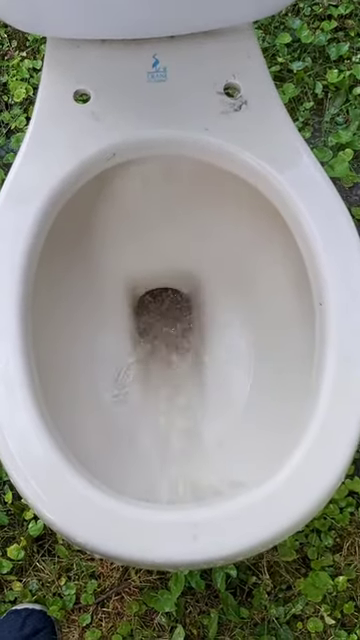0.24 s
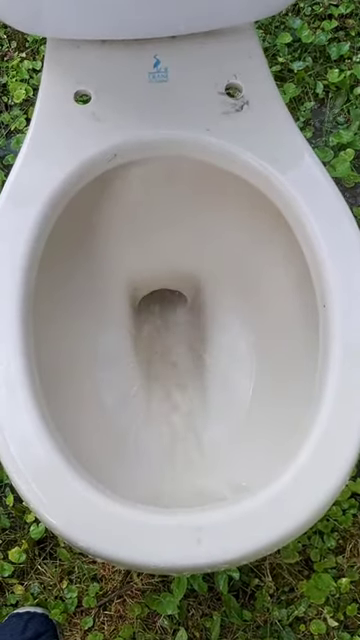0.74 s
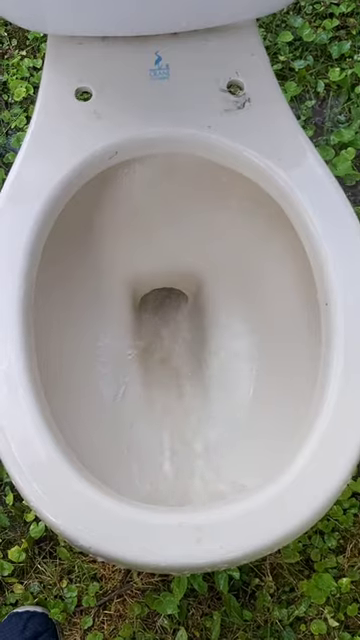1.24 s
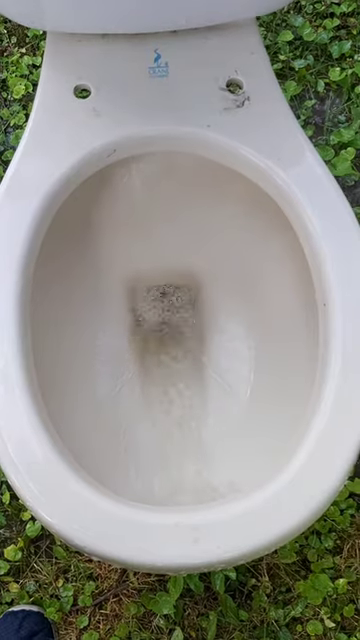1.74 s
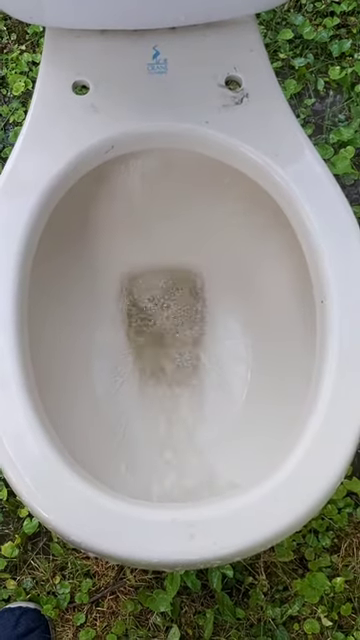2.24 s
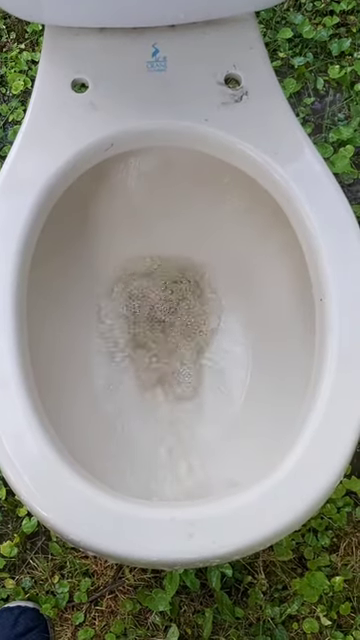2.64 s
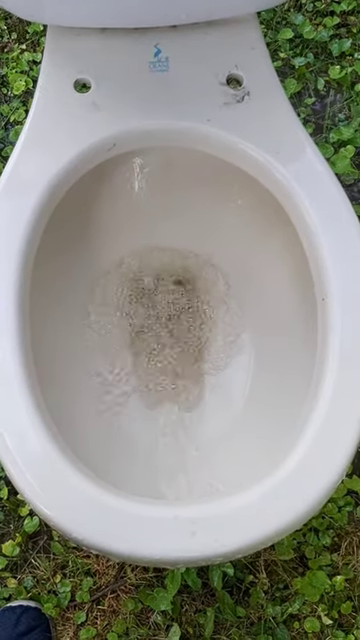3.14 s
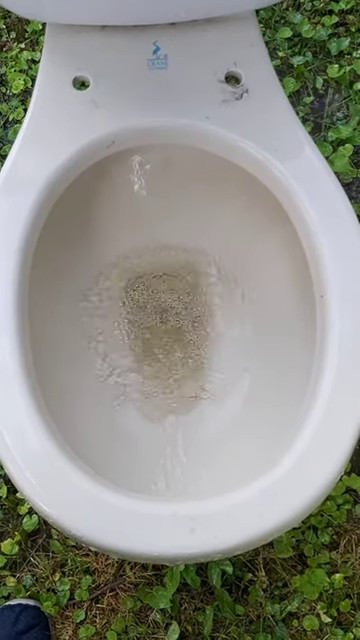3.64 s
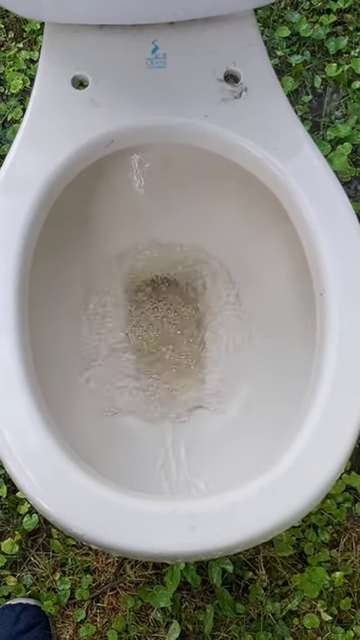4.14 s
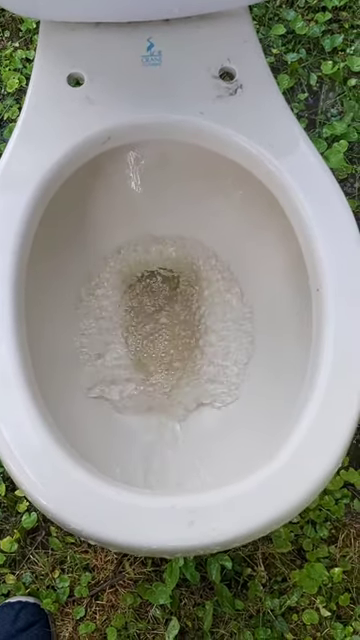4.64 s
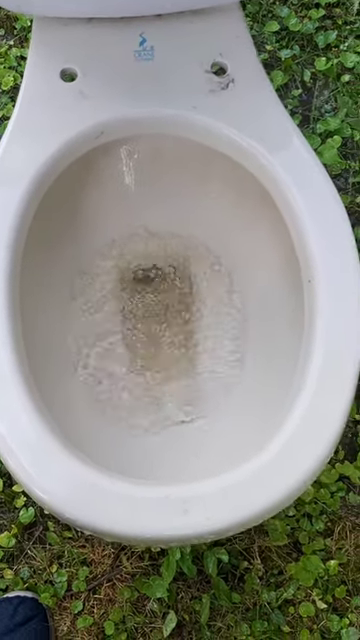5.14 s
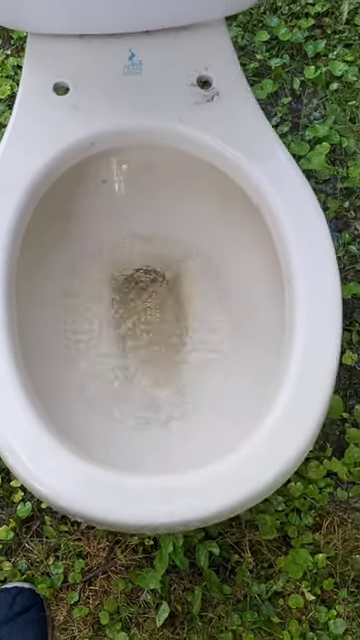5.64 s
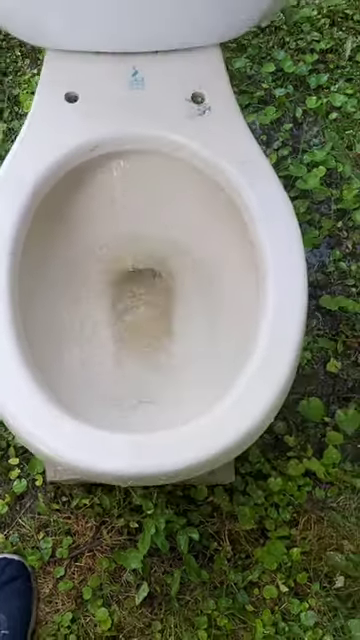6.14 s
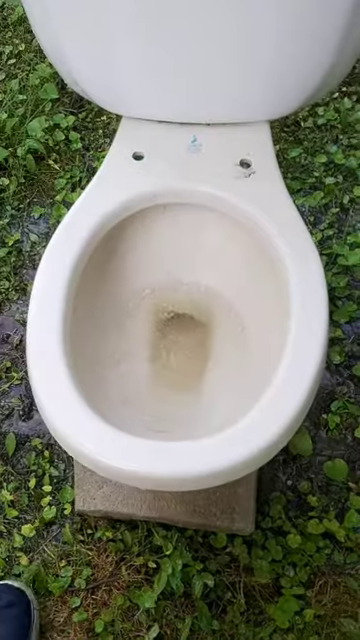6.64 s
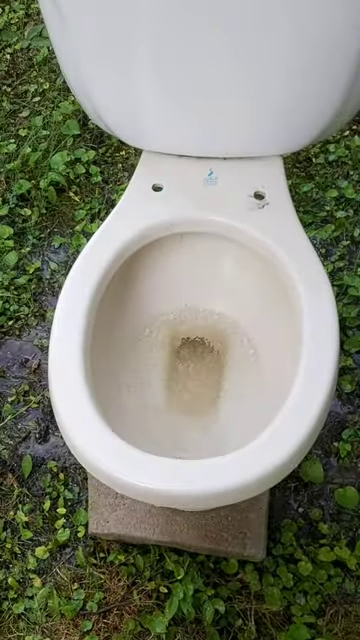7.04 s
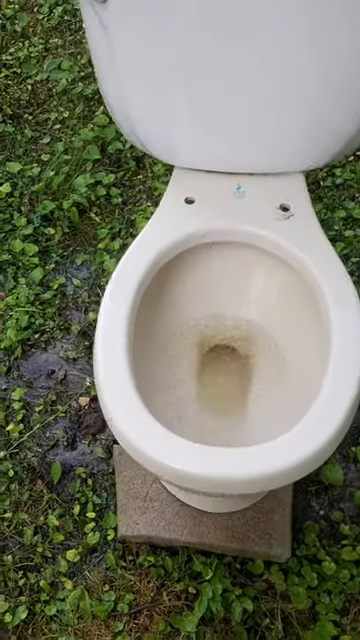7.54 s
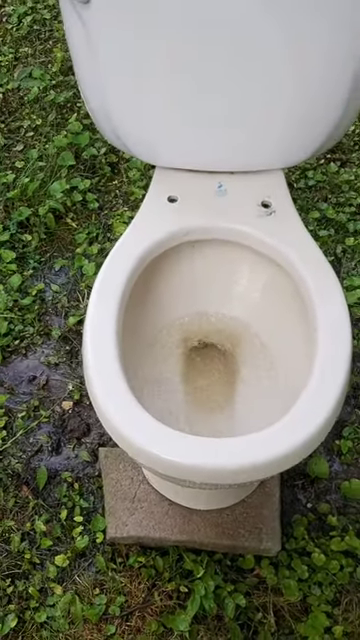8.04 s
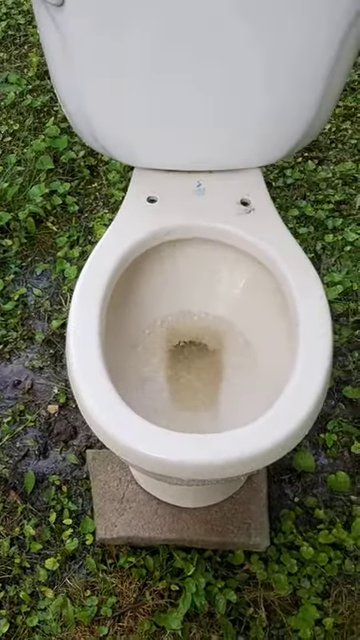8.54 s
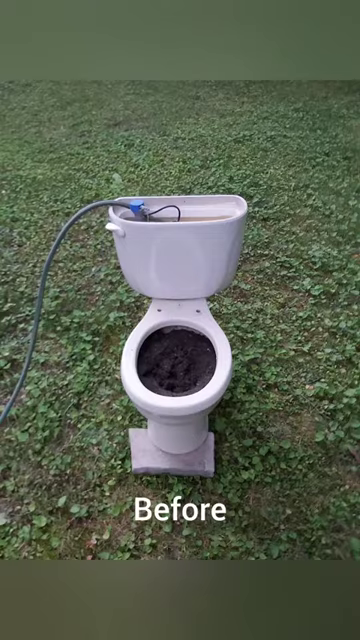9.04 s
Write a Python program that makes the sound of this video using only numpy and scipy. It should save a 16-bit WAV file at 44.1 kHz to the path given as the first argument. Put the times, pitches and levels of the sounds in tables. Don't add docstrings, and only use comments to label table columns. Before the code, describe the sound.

Close-up rush of water in a porcelain bowl outdoors, gurgling and crackling, fading to a sparse trickle and quiet drips before sudden silence.

```python
import sys
import numpy as np
from scipy import signal
from scipy.io import wavfile
from scipy.ndimage import uniform_filter1d

SR = 44100
rng = np.random.default_rng(int(sys.argv[2]) if len(sys.argv) > 2 else 0)


def boost(x):
    u = np.asarray(x, float) / 20
    return 10 ** u


def bounce(signal):
    frames = np.transpose(np.atleast_2d(signal))
    limited = np.clip(frames, -1, 1)
    pcm = np.round(limited * 32767).astype(np.int16)
    wavfile.write(sys.argv[1], SR, pcm)


N = 410123


def evened(x):
    return x / np.sqrt(np.mean(x ** 2) + 1e-20)


def read(points, hz):
    f, value = np.transpose(points)
    return np.interp(np.log(hz + 1), np.log(f + 1), value)


def curves(rows, t):
    s, *columns = np.transpose(rows)
    return [np.interp(t, s, c) for c in columns]


def resonate(x, hz, width):
    turn = np.exp(2j * np.pi * np.cumsum(hz * np.ones(len(x))) / SR)
    r = np.exp(-np.pi * width / SR)
    return 2 * (turn * signal.lfilter([1 - r], [1, -r], x / turn)).real


def rung(x, modes, lift_db):
    return sum(boost(db + lift_db) * signal.lfilter(*signal.iirpeak(hz, hz / width, SR), x)
               for hz, width, db in modes)


def lumps(seconds):
    width = max(int(seconds * SR), 1)
    return evened(uniform_filter1d(uniform_filter1d(rng.standard_normal(N), width), width))


def sides(x, pan_db):
    return np.array([x * boost(pan_db / 2), x * boost(-pan_db / 2)])


def paste(mix, s, pair):
    mix[:, round(s * SR):][:, :pair.shape[1]] += pair


# [start_s, splash_db]
FLOW = [(0.0, -27.5), (0.35, -31.5), (0.78, -28.5), (1.43, -31), (2.38, -32), (2.42, -34), (2.73, -35.5),
        (3.25, -39), (3.44, -38.5), (3.54, -40), (4.32, -46), (4.62, -41), (4.71, -37), (4.97, -43),
        (4.995, -49.5), (5.64, -51.5), (5.96, -56.5), (6.22, -59.5), (8.3, -60.5)]
# [start_s, spray_over_splash_db]
RIM_JETS = [(0.0, -1.5), (0.3, 5.5), (0.8, -2.5), (1.43, 3.5), (2.3, 1), (3.3, -0.5), (3.45, -5),
            (4.05, -4), (4.3, 0.5), (5.0, 0)]
# [start_s, left_right_db]
CAMERA_TURN = [(0.0, -0.5), (4.0, -1.5), (5.6, -2), (6.2, -7.5), (6.96, -9.5), (7.9, -5.5), (8.3, -6)]


def flow(t):
    splash_db = curves(FLOW, t)[0]
    return splash_db, splash_db + curves(RIM_JETS, t)[0], curves(CAMERA_TURN, t)[0]


# [freq_hz, density_db_per_hz]
RUSH_COLOUR = [(24, -47.5), (40, -39), (180, -24), (276, -14), (433, -9.5), (697, -6), (1630, 0),
               (2000, -6.5), (2210, -5), (6490, -4.5), (8340, -14), (11800, -6.5), (16000, -10.5)]
# [freq_hz, density_db_per_hz]
TRICKLE_COLOUR = [(24, -39), (40, -6), (109, -9), (194, -9.5), (305, -5), (615, -10.5), (831, -10.5),
                  (2050, -12), (3740, -24.5), (5720, -19.5), (16000, -39)]
# [freq_hz, correlation]
PORT_LIKENESS = [(60, .9), (300, .95), (700, .97), (1400, .88), (3000, .6), (7000, .35), (15000, .3)]
# [freq_hz, left_right_db]
PORT_TILT = [(60, 2.5), (150, -16), (380, -10.5), (950, 3), (2380, -12), (5980, -2), (15000, -8.5)]
# [start_s, lead_samples]
LEFT_LEAD = [(0, 2), (2.7, 2), (3.1, 16), (5.8, 16), (6.2, -2), (8.6, -1)]


def rush():
    frames, hz = N // 128 + 5, np.fft.rfftfreq(512, 1 / SR)
    frame_s = np.arange(frames) * 128 / SR
    water_s = frame_s - 256 / SR
    a, b, c, d, patches, wide = rng.standard_normal((frames, 257, 6)).T
    patches = evened(uniform_filter1d(uniform_filter1d(patches, 5, 0), 8, 1))
    wide = evened(uniform_filter1d(uniform_filter1d(wide, 90, 0), 4, 1))
    splash_db, spray_db, pan_db = flow(water_s)

    strong = np.clip((splash_db + 66.0) / 22, 0, 1)
    colour_db = strong * read(RUSH_COLOUR, hz)[:, None] + (1 - strong) * read(TRICKLE_COLOUR, hz)[:, None]
    power, high = boost(2 * colour_db), hz > 3500
    spray_share = np.clip((hz[:, None] - 3000) / 1200, 0, 1)
    colour_db += (1 - spray_share) * (splash_db - 10 * np.log10(power[(hz > 450) & ~high].sum(0)))
    colour_db += spray_share * (spray_db - 10 * np.log10(power[high].sum(0)))

    wander = 2 * evened(uniform_filter1d(rng.standard_normal(frames), 60))
    lead = curves(LEFT_LEAD, frame_s)[0] + wander
    same = np.clip(read(PORT_LIKENESS, hz), -1, 1)[:, None]
    left = a + 1j * b
    right = same * left * np.exp(-2j * np.pi * hz[:, None] * lead / SR)
    right = right + np.sqrt(1 - same ** 2) * (c + 1j * d)
    pan_db = pan_db + read(PORT_TILT, hz)[:, None] + 7.0
    z = np.array([left * boost(pan_db / 2), right * boost(-pan_db / 2)])

    patch_db = (0.8153 + 0.56 * strong) * np.minimum(2.12 * patches + 1.14 * wide, 5.5)
    surge_db = (hz > 450)[:, None] * strong ** 2 * surges(water_s)
    z *= boost(colour_db + patch_db + surge_db)
    return signal.istft(z, nperseg=512, noverlap=384)[1][:, :N]


def surges(t):
    surge_db, surge_s = 5.5, 0.007
    rows = BUBBLES + GURGLES + POPS + STRAYS + TICKS + LATE_TICKS + LONE_TICKS
    moments = np.array([row[0] for row in rows])
    near = np.exp(-.5 * ((t[:, None] - moments - surge_s / 2) / surge_s) ** 2)
    busy = np.tanh(near.sum(1))
    return surge_db * (busy - uniform_filter1d(busy, size=80))


def bubble(hz, t60, rise, glide, rounded=0):
    t = np.arange(int(t60 * SR)) / SR
    shape = (1 - np.exp(-t / rise)) ** 2 * boost(-60 * (t / t60) ** (1 + rounded))
    return shape / shape.max() * np.sin(2 * np.pi * hz * (t + glide * t ** 2 / t60))


def fizz():
    splash_db, spray_db, pan_db = flow(np.arange(N) / SR)
    per_s = 1500 * boost(np.minimum(3.5 * lumps(.010), 6.))
    size = boost(6.2 * np.minimum(rng.exponential(1, N), 2.2)) * (rng.random(N) < per_s / SR)
    kind = rng.integers(0, 40, N)
    out = np.zeros((2, 2, N))
    for k, hz in enumerate(np.geomspace(520, 14500, 40)):
        grain = bubble(hz, 0.0064 + 26 / hz, 1.94 / hz, 0.1) * boost(read(RUSH_COLOUR, hz)) * hz ** 0.33
        at = np.flatnonzero(size * (kind == k))
        places = (at[:, None] + np.arange(len(grain))).ravel()
        patch = np.bincount(places, np.outer(size[at], grain).ravel(), N)
        patch = sides(patch[:N], rng.uniform(-12.0, 0.75))
        out[int(hz > 3500)] += patch[0], np.roll(patch[1], (2, 17)[k % 2])
    out = boost(splash_db - 1.5) * evened(out[0]) + boost(spray_db - 8.0) * evened(out[1])
    thin_db = np.clip(0.14 * (splash_db + 41.0), -5., 0)
    t = np.arange(0, N + 128, 128) / SR
    surge_db = np.interp(np.arange(N) / SR, t, surges(t))
    return sides(boost(thin_db + surge_db), pan_db) * out


# [freq_hz, width_hz, level_db]
BOWL_LOW = [(689, 37, -1), (1002, 42, -11.5), (1660, 89, -17), (2130, 110, -4), (2636, 95, -1),
            (4260, 190, -8.5), (6000, 250, -34)]
# [freq_hz, width_hz, level_db]
BOWL_HIGH = [(740, 136, -8), (1000, 59, -12), (1520, 37, -12.5), (2210, 43, -3), (2850, 13, 0),
             (4440, 64, -11)]


def bowl(water):
    fill_s = 2.82
    risen = np.clip((np.arange(N) / SR - fill_s) / 0.26 + .5, 0, 1)
    ringing = (1 - risen) * rung(water, BOWL_LOW, 3.0) + risen * rung(water, BOWL_HIGH, 5.6)
    return boost(-2.5) * (water + ringing)


# [start_s, hum_over_flow_db, pitch_hz]
DRAWN_AIR = [(0.02, -12.5, 282), (0.33, -12, 285), (0.5, -2, 286), (1.11, -10, 261), (1.55, -1.5, 237),
             (1.8, -19.5, 288), (2.0, -6, 293), (3.28, -4, 286), (4.25, -12, 263), (4.7, -5.5, 259),
             (4.8, -13.5, 274), (4.94, -17, 300), (5.06, -6, 295), (6.22, -9.5, 296), (8.3, -37.5, 276)]


def hollow():
    t = np.arange(N) / SR
    drawn_db, hz = curves(DRAWN_AIR, t)
    noise = rng.standard_normal((3, N))
    hz = hz + 12 * lumps(0.029)
    hum = resonate(noise[0] * boost(4.7 * lumps(0.055)), hz, 89)
    hum = evened(resonate(hum, hz, 90))
    rumble = noise[1] * boost(2.5 * lumps(.05))
    rumble = resonate(rumble, 102 + 12 * lumps(0.087), 36)
    rumble = evened(resonate(rumble, 100, 160))
    apart = 3. * resonate(noise[2], 70, 60) * np.array([[1], [-1]])
    return sides(hum * boost(flow(t)[0] + drawn_db), -8.5) + (sides(rumble, -1.0) + apart) * heaving(t)


# [centre_s, peak_db, spread_s]
HEAVES = [(0.62, -52.5, 0.3), (1.72, -44.5, 0.21), (3.0, -56, 0.43), (3.35, -40.5, 0.05),
          (4.22, -48.5, 0.11), (4.9, -58, 0.31)]


def heaving(t):
    swells = sum(boost(db) * np.exp(-.5 * ((t - s) / length) ** 2) for s, db, length in HEAVES)
    return boost(-68) + swells


def fluttered(ring, width):
    return ring * (1 + .3 * evened(uniform_filter1d(rng.standard_normal(len(ring)), size=width)))


# [start_s, peak_db, pitch_hz, t60_s]
GULPS = [(0.368, -15.5, 271, 0.059), (0.446, -17.5, 284.7, 0.16), (0.467, -19, 284, 0.12),
         (0.502, -12, 300, 0.016), (0.574, -16, 300, 0.039), (0.644, -11, 283, 0.12),
         (0.674, -12.5, 288, 0.1), (0.749, -24.5, 230, 0.082), (0.785, -20, 296, 0.024),
         (0.905, -17.5, 268, 0.032), (1.184, -28.5, 280, 0.087), (1.355, -20, 257, 0.052),
         (1.943, -25.5, 293, 0.08), (2.052, -28, 306, 0.054), (2.152, -32, 333, 0.19),
         (2.368, -28.5, 297, 0.025), (2.548, -32, 300, 0.039), (2.581, -33, 298, 0.073),
         (2.727, -29.5, 307, 0.079), (3.029, -28.5, 313, 0.081), (3.656, -28, 258.6, 0.17),
         (4.37, -32, 255, 0.13), (4.504, -29.5, 255, 0.13), (4.905, -38, 310, .08)]


def gulps(out):
    for s, db, hz, t60 in GULPS:
        gulp = fluttered(bubble(hz, t60, 0.0045, 0.048, .5), int(SR / hz))
        paste(out, s, sides(gulp * boost(db), -5.5))


# [start_s, peak_db, pitch_hz, t60_s]
BUMPS = [(1.49, -39.5, 93, 0.2), (1.769, -34.5, 87.5, 0.2), (3.599, -33, 140, 0.32),
         (3.702, -28.5, 128, 0.2), (5.35, -37.5, 100.5, 0.35), (5.361, -45, 168, .15),
         (6.0, -53, 47.3, 0.38), (6.26, -61, 50, 0.18)]


def bumps(out):
    for s, db, hz, t60 in BUMPS:
        paste(out, s, sides(bubble(hz, t60, 0.0047, .01) * boost(db), -2.5))


# [start_s, peak_db, pitch_hz]
BUBBLES = [(0.03, -22.5, 1020), (0.364, -24, 650), (0.443, -20, 1000), (0.501, -17, 1227),
           (0.735, -29, 2550), (0.825, -29, 690), (0.906, -32, 740), (0.925, -25, 2040), (1.039, -33, 717),
           (1.15, -23.5, 1277), (1.493, -28.5, 607), (2.025, -19, 1000), (2.182, -25, 1720),
           (2.226, -29.5, 1720), (2.6, -26, 1280), (2.729, -26, 2800)]
# [start_s, peak_db, pitch_hz]
GURGLES = [(2.991, -38, 689), (3.051, -38.5, 1660), (3.102, -49, 1170), (3.251, -36, 2850),
           (3.296, -30, 3190), (3.348, -32, 850), (3.425, -31.5, 720), (3.485, -29, 1500),
           (3.702, -39, 2800), (3.815, -40, 1520), (3.845, -37, 486), (3.98, -39, 737), (4.01, -42, 1520),
           (4.103, -42, 2710), (4.212, -40, 760), (4.28, -32.5, 1052), (4.405, -36, 678),
           (4.492, -32.5, 785), (4.637, -42.5, 1000), (4.656, -39, 2150), (4.709, -27.5, 3100),
           (4.765, -26, 2864), (4.791, -28.5, 2820), (4.811, -29.5, 1534), (4.882, -26, 1520),
           (4.989, -52, 1217)]
# [pitch_hz, left_right_db]
PLACE_LOW = [(650, 8), (740, 11), (1000, -1), (1300, 6.5), (1750, 10), (2700, -6)]
# [pitch_hz, left_right_db]
PLACE_HIGH = [(520, 0), (780, 5), (1020, -20), (1230, 53), (1520, -14.5), (2200, -28), (2850, -13),
              (3250, -17)]
# [start_s, peak_db, pitch_hz, t60_s, left_right_db]
DRIPS = [(5.123, -46.5, 540, 0.05, -7), (5.147, -44.5, 1070, 0.081, -11), (5.158, -40, 774, 0.19, 11),
         (5.217, -37.5, 937, 0.07, 4), (5.234, -35.5, 760, 0.074, 2), (5.492, -35, 804, 0.12, 2),
         (5.674, -40, 760, 0.058, 1), (5.772, -31, 834, 0.05, 4), (5.841, -47.5, 820, 0.15, 20),
         (6.13, -43.5, 820, 0.087, -5), (6.312, -36.5, 744, 0.019, -8), (6.425, -53, 2070, 0.037, -5),
         (7.001, -54, 2300, .03, -10), (7.049, -45.5, 1990, 0.039, -7), (7.112, -44, 2080, 0.046, -5),
         (8.012, -49, 2700, 0.014, -12), (8.117, -50, 1540, 0.024, -17), (8.232, -50, 2240, 0.036, -11.5),
         (8.282, -47, 2070, 0.034, -8), (8.349, -51.5, 1110, 0.18, 16), (8.495, -46.5, 1140, 0.14, -15)]
# [start_s, peak_db, pitch_hz, t60_s]
DROP_PARTIALS = [(1.945, -28, 1670, 0.035), (2.065, -18, 2130, 0.015), (2.37, -27, 2130, 0.096),
                 (4.73, -26, 1050, 0.023), (4.737, -29, 2850, 0.022), (4.845, -26, 796, 0.03),
                 (5.435, -38, 793, 0.24), (5.772, -42.5, 538, 0.087), (6.313, -42, 600, 0.1),
                 (7.141, -51.5, 1690, 0.12), (8.35, -44, 905, 0.058), (8.496, -51, 920, 0.087)]
# [start_s, peak_db, pitch_hz]
POPS = [(0.05, -12, 1680), (0.134, -21, 740), (0.208, -16.5, 974), (0.524, -21, 650), (0.622, -15.5, 752),
        (0.786, -15.5, 651), (0.86, -16.5, 745), (0.968, -17.5, 1246), (1.081, -19, 1360),
        (1.317, -21.5, 730), (1.556, -21, 620), (1.576, -25, 980), (1.603, -22, 1420), (1.645, -12.5, 2610),
        (1.669, -17.5, 1760), (1.687, -17, 2530), (1.708, -16, 1000), (1.782, -18, 2550),
        (1.927, -23, 1720), (1.95, -13.5, 1620), (1.986, -19, 1660), (2.051, -14, 1590), (2.093, -23, 1650),
        (2.135, -31, 1190), (2.255, -18, 1750), (2.285, -17.5, 1770), (2.327, -22, 2070),
        (2.409, -20.5, 2260), (2.469, -17, 1370), (2.547, -20.5, 1520), (2.582, -17.5, 2230),
        (2.662, -18, 1494), (2.695, -19.5, 2180)]
# [start_s, peak_db, pitch_hz]
STRAYS = [(3.5862, -32, 2210), (3.7967, -36, 1570), (3.8706, -41, 1260), (3.904, -26, 1260),
          (4.1574, -31, 2700), (4.343, -32, 1780), (4.4057, -33.5, 3100), (4.4308, -33.5, 2520),
          (4.5256, -26, 1690)]
# [start_s, peak_db, pitch_hz]
PATTER = [(4.584, -41, 791), (4.68, -37, 2950), (4.692, -39, 3000), (4.748, -33, 2250),
          (4.806, -28.5, 2500), (4.85, -19, 1500), (4.947, -35, 840), (4.988, -27, 1550),
          (5.146, -47, 2140), (5.178, -47, 2050), (5.18, -36, 760), (5.232, -43, 2940), (5.378, -44, 760),
          (5.413, -44, 754), (5.415, -43, 2820), (5.445, -42.5, 2980), (5.455, -40, 840),
          (5.592, -41, 1050), (5.638, -42, 770), (5.64, -35, 1350), (5.642, -49, 2850), (5.695, -48, 2390),
          (5.775, -44, 2030), (5.824, -46, 3400), (5.855, -40.5, 2050), (6.078, -52, 830),
          (6.106, -50, 785), (6.163, -51, 2130), (6.314, -63, 2020), (6.491, -54, 2050), (6.526, -51, 1390),
          (6.705, -57, 2030), (6.75, -53, 2300), (7.385, -53.5, 860), (7.471, -54, 1390),
          (7.525, -55, 2270), (7.712, -59, 1420), (7.74, -57, 2540), (8.069, -52.5, 1500),
          (8.088, -54, 2970), (8.175, -55, 1195), (8.355, -54, 1600), (8.402, -57, 2800),
          (8.403, -55.5, 2070), (8.497, -51, 1650), (8.502, -56, 2860), (8.565, -53, 900)]


def drops():
    def ring_s(hz):
        return .013 + 30. / hz

    rows = [(s, db, hz, ring_s(hz), read(place, hz))
            for table, place in ((BUBBLES, PLACE_LOW), (GURGLES, PLACE_HIGH)) for s, db, hz in table]
    slapped, own = [], 0.23
    for row in rows + DRIPS:
        slap_db = (1 - own) * flow(row[0])[0] + own * row[1]
        slapped.append(row + (min(slap_db, row[1] - 1.5),))
    small = [(s, db + less_db, hz, 0.78 * ring_s(hz), flow(s)[2], db - 12.5)
             for table, less_db in ((POPS, -9.5), (STRAYS, -6.), (PATTER, 0)) for s, db, hz in table]
    return slapped + [row + (-3., row[1] - 20.) for row in DROP_PARTIALS] + small


def add(mix, s, pair):
    for port, late, sound in zip(mix, (0, curves(LEFT_LEAD, s)[0]), pair):
        port[round(s * SR + late):][:len(sound)] += sound


SWELL_S = 0.00249
# [freq_hz, width_hz, level_db]
TRAP_AIR = [(510, 100, -2.5), (760, 33, -10), (920, 37, -13.5), (1170, 12, 7), (1680, 130, 0),
            (2130, 500, -6.5), (2800, 290, -10.5)]


def ringing_drops(out):
    wet, fade = np.zeros_like(out), np.arange(1200) / SR
    for s, db, hz, t60, pan_db, slap_db in drops():
        burst, detune = rng.standard_normal(1200), rng.uniform(-0.92, 1)
        ring = bubble(hz, 0.99 * t60, SWELL_S, 0.034, 0.13)
        ring += .27 * bubble(hz * (1 + .07 * detune), t60, .006, .06)[:len(ring)]
        ring = fluttered(ring, int(2 * SR / hz))
        add(out, s - SWELL_S, sides(ring * boost(db), pan_db))
        snap = resonate(burst[::-1] * boost(-60 * fade / .010), 2 * hz, 2 * hz)
        add(out, s - SWELL_S / 2, sides(snap * boost(db - 11.), pan_db))
        slap = burst * boost(slap_db - 60 * fade / 0.029) * np.minimum(fade / 0.00359, 1)
        paste(wet, s, sides(slap, pan_db))
    out += rung(wet, TRAP_AIR, 16.6)
    out += .06 * wet


# [start_s, peak_db, start_hz, t60_s,
# climb_ratio]
CLIMBERS = [(0.266, -14.5, 550, 0.029, 0.53), (0.292, -24, 549, 0.073, 0.92), (4.7, -30, 1170, .07, 0.32),
            (4.834, -24, 516, .06, 0.28), (6.23, -23.5, 820, 0.063, 0.016), (6.321, -36.5, 740, .06, 0.24)]


def climbers(out):
    for s, db, hz, t60, climb in CLIMBERS:
        add(out, s - SWELL_S, sides(bubble(hz, t60, SWELL_S, climb, 0.7) * boost(db), flow(s)[2] + 3.4))


# [start_s, peak_db, centre_hz]
SPITS = [(1.038, -23, 4190), (1.109, -24.5, 6300), (1.225, -23.5, 6000), (1.407, -23.5, 11800),
         (2.137, -26, 12300), (2.2562, -18, 4700), (2.446, -25, 5100), (4.32, -35, 5470),
         (4.8963, -44, 4160), (5.412, -48, 7040), (5.44, -36, 4440), (5.72, -43, 5300)]


def spits(out):
    fade = np.arange(1200) / SR
    for s, db, hz in SPITS:
        spit = rng.standard_normal(1200) * boost(db - 60 * fade / 0.067)
        spit = 1.04 * signal.lfilter(*signal.iirpeak(hz, 1.3, SR), spit)
        paste(out, s, sides(spit, -1.5))


def pockets():
    out = np.zeros((2, N + SR))
    for play in (gulps, bumps, ringing_drops, climbers, spits):
        play(out)
    echo = np.roll(out, 190, axis=1) * 0.15 + np.roll(out[::-1], 410, axis=1) * 0.16
    return (out + echo)[:, :N]


def crackle():
    decay_s, level_db = .0018, -8.5
    splash_db, spray_db, pan_db = flow(np.arange(N) / SR)
    hits = boost(2.0 * np.minimum(rng.exponential(1, N), 3)) * (rng.random(N) < 45 / SR)
    puff = signal.lfilter([1], [1, -np.exp(-1 / (decay_s * SR))], hits) * rng.standard_normal((2, N))
    return sides(boost(spray_db + level_db), pan_db) * evened(np.diff(puff, prepend=0))


# [start_s, peak_db]
TICKS = [(0.1585, -30), (0.2074, -22), (0.2473, -17.5), (0.2648, -7.5), (0.3506, -17), (0.3955, -23),
         (0.4414, -18), (0.5935, -14), (0.611, -14), (0.7931, -12), (0.8215, -7.5), (0.8485, -17),
         (1.0355, -19), (1.1104, -9.5), (1.1977, -20.5), (1.2256, -6), (1.2735, -19.5), (1.3134, -9),
         (1.3374, -20), (1.3753, -20), (1.4072, -17), (1.5404, -24), (1.5539, -21), (1.5908, -21.5),
         (1.6397, -18), (1.6861, -22), (1.7823, -24), (1.9485, -20), (2.0118, -7), (2.0931, -26),
         (2.138, -19), (2.1934, -20), (2.2563, -24), (2.2897, -21), (2.3685, -16), (2.4498, -23),
         (2.6389, -20), (2.7407, -13), (2.9367, -15), (3.05, -13), (3.0974, -26), (3.6202, -32),
         (4.2273, -23), (4.3246, -36), (4.6384, -16), (4.6962, -23.5), (4.8983, -32), (5.4141, -24)]
# [start_s, peak_db]
LATE_TICKS = [(4.66, -19), (4.709, -21), (4.738, -24), (4.765, -32), (4.808, -27), (5.722, -38),
              (5.826, -33)]
# [start_s, peak_db]
LONE_TICKS = [(3.2191, -26), (3.296, -15), (3.3273, -34), (3.488, -26), (3.9804, -32), (4.2737, -23),
              (5.0044, -38), (5.3597, -33), (5.5852, -41), (5.6255, -44), (7.0374, -42), (7.3791, -43),
              (7.4694, -47)]


def ticks():
    level_db, t60_s, lower_edge_hz = -3, 0.0053, 2500
    out, t = np.zeros((2, N)), np.arange(900) / SR
    for s, db in TICKS + LATE_TICKS + LONE_TICKS:
        crack = rng.standard_normal((2, 900)) * np.minimum(t / .0006, 1)
        add(out, s, (crack + 0.58 * crack[0]) * boost(db + level_db - 60 * t / t60_s))
    return signal.lfilter(*signal.butter(2, lower_edge_hz, "high", fs=SR), out)


# [start_s, level_db, length_s, centre_hz]
SWISHES = [(5.35, -54, .16, 6000), (6.717, -58.5, 0.19, 11000), (6.95, -56.5, .19, 6000),
           (6.987, -53.5, 0.082, 5800), (7.108, -57, 0.044, 5800)]


def swishes():
    out = np.zeros((2, N))
    for s, db, length, hz in SWISHES:
        count = int(length * SR)
        hiss = rng.standard_normal((2, count))
        hiss = hiss * uniform_filter1d(rng.exponential(1, count) ** 3, 90)
        hiss = evened(signal.lfilter(*signal.iirpeak(hz, 0.49 + .05 / length ** 1.6, SR), hiss))
        hiss = hiss * signal.windows.tukey(count, .6)
        paste(out, s, sides(boost(db), -7.0)[:, None] * hiss)
    return out


# [start_s, pitch_hz, level_db]
SQUEAK = [(7.315, 10800, -88.5), (7.335, 11850, -77), (7.37, 11250, -71), (7.425, 11200, -71),
          (7.47, 11600, -68), (7.49, 10800, -72), (7.55, 10500, -80)]


def squeak():
    t = np.arange(N) / SR
    hz, db = curves(SQUEAK, t)
    on = uniform_filter1d(1. * (t > SQUEAK[0][0]) * (t < SQUEAK[-1][0]), 600)
    tone = np.sin(2 * np.pi * np.cumsum(hz) / SR)
    return sides(on * boost(db + 1.0 + 2. * lumps(0.008)) * tone, -20.0)


def scene():
    return bowl(rush() + fizz()) + hollow() + crackle() + pockets() + ticks() + swishes() + squeak()


def band_limit(x):
    return signal.sosfilt(signal.butter(12, 16990, fs=SR, output="sos"), x)


# [freq_hz, share_of_cells]
TREBLE_GAPS = [(4000, .015), (7300, .01), (8300, .16), (10300, .08), (11500, .01), (13600, .05)]


def record(dry):
    cut_s = 8.569
    late = np.arange(N) / SR - cut_s
    smear = boost(-13.5 - 310 * late.clip(0)) * (late < .024)
    hz, t, z = signal.stft(dry * np.where(late < 0, 1, smear), SR, nperseg=1024, noverlap=768)
    cells = rng.random((len(t) // 5 + 1, len(hz) // 8 + 1)).repeat(5, 0).repeat(8, 1)
    cells = cells[:len(t), :len(hz)].T
    moved = hz[:, None] - 2000 * (t > 6.2) * (hz[:, None] < 12500)
    missing = cells < read(TREBLE_GAPS, moved.clip(0)) * (hz[:, None] > 3500)
    z *= np.where(missing, .03, 1) * (hz < 16000)[:, None]
    heard = signal.istft(z, SR, nperseg=1024, noverlap=768)[1][:, :N] * (late < .024)
    return band_limit(heard)


dry = scene()
out = record(dry)
bounce(out)
```